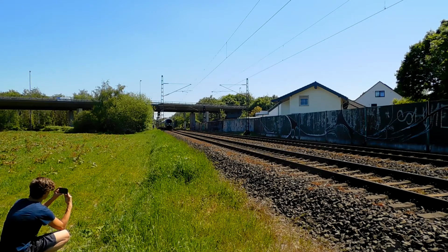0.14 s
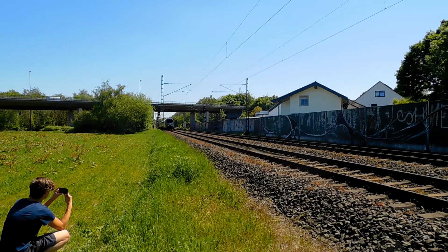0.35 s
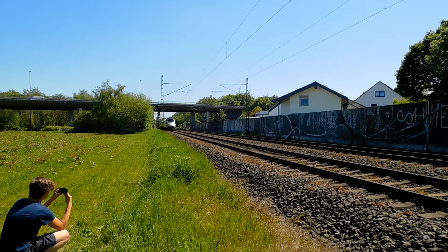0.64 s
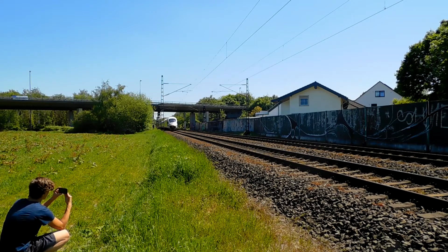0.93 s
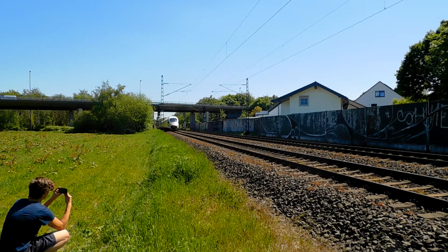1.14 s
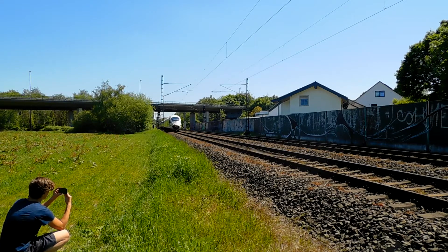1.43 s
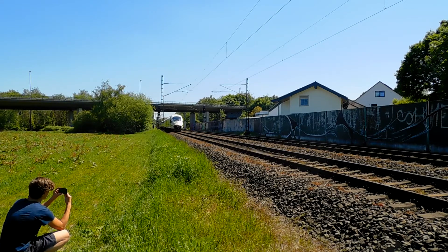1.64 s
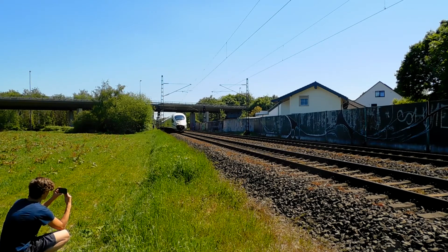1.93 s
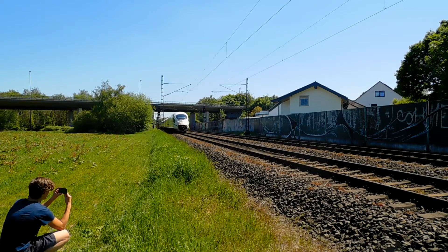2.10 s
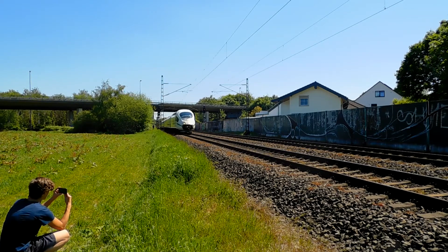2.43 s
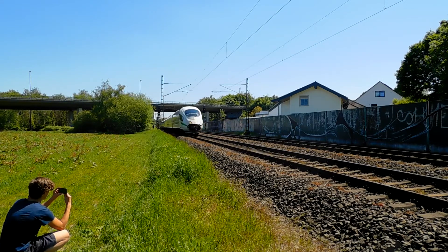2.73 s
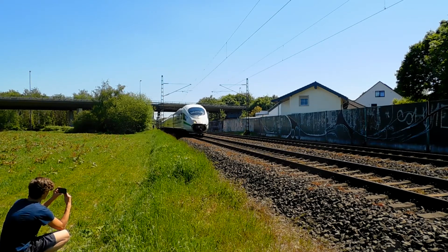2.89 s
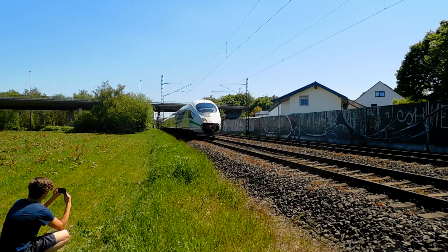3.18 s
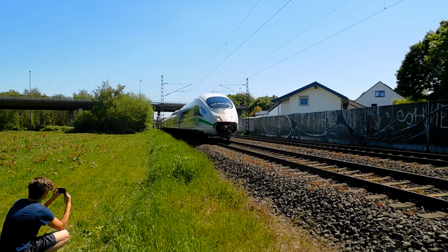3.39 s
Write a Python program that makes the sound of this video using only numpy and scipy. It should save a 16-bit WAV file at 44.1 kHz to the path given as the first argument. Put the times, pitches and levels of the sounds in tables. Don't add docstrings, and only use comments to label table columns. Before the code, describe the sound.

An electric passenger train approaches as rails sing, knock and hiss, its roar building outdoors.

```python
import sys
import numpy as np
from scipy import signal
from scipy.fft import rfft, irfft
from scipy.io import wavfile

SR = 44100
rng = np.random.default_rng(int(sys.argv[2]) if len(sys.argv) > 2 else 0)


def transcribe(u):
    v = np.clip(np.atleast_2d(u).T, -1, 1)
    q = np.round(v * 32767).astype(np.int16)
    wavfile.write(sys.argv[1], SR, q)


def linear_from_db(decibels):
    return 10 ** (np.asarray(decibels, float) / 20)


N = 156555
TIME_S = np.arange(N) / SR
HOP = 128
HZ = np.maximum(np.fft.rfftfreq(N, 1 / SR), 1)

# frequency in Hz, likeness 0 to 1.
LIKENESS = [(60, .92), (450, .98), (620, .62), (950, .7), (1400, .92), (1750, .4), (2050, .7), (2400, .5)]
# frequency in Hz, lead of left in radians.
LEAD_RAD = [(200, 0), (860, -.4), (1500, -2.1), (2000, -.2), (2300, -2.1), (2800, 0.05), (5500, .9),
            (15500, -9.2)]
# frequency in Hz, left over right in dB.
TILT_DB = [(500, 0.1), (1900, 0.1), (2350, -5), (3200, 0), (4500, -1), (5800, -3), (10000, -5), (14000, -2)]
# frequency in Hz, density in dB per Hz.
SELF_NOISE = [(8000, -19), (11500, -14), (13000, 0), (15600, 6)]
SELF_NOISE_DB = -64

# frequency in Hz, density in dB per Hz.
TRAFFIC = [(65, -56), (110, -22), (297, -19), (389, -11), (755, -4.5), (1290, -6), (1440, 0.5), (3800, -27),
           (15500, -80)]
TRAFFIC_DB = -41

# frequency in Hz, density in dB per Hz.
WIND = [(20, 0), (45, -1), (100, -5), (220, -11), (450, -32)]
WIND_DB, GUST_DB = -73, 2.5
# time in seconds, lift in dB.
PUFFS = [
    (.2, 12),
    (1.22, 14),
    (1.45, 9),
    (1.75, 6.9),
    (2.14, 14),
    (2.44, 6.8),
]
PUFF_S = 0.09

# time in seconds, level in dB.
RUMBLE = [(0.0, -62.5), (0.51, -67.5), (3.55, -55)]
# frequency in Hz, density in dB per Hz.
RUMBLE_COLOUR = [(42, -2), (62, -1.5), (95, -5), (130, -17.5)]

# time in seconds, singing in dB, hiss in dB, whine in dB.
RAILS = [(0, -42, -69.5, -68), (.5, -43.5, -69.5, -68), (1.1, -38, -65, -78), (1.46, -38.5, -64.5, -52),
         (1.53, -37.5, -59, -42.5), (1.75, -32, -58.5, -50), (2.3, -32, -54.5, -41), (2.6, -32, -54.5, -49),
         (3.04, -30.5, -53, -47), (3.09, -32.5, -52.5, -33), (3.25, -35, -51, -39.5),
         (3.32, -34, -50.5, -41), (3.55, -27.5, -50.5, -37.5)]
# frequency in Hz, density in dB per Hz.
RAIL_BODY = [(300, -27.5), (600, -21.5), (850, -8.5), (1200, -4), (1650, -11), (1850, -28), (2700, -25),
             (4300, -40)]
# frequency in Hz, width in Hz, lift in dB.
RAIL_MODES = [(466, 30, 13.5), (672, 52, 8.5), (740, 39, 3), (923, 130, 1), (1040, 175, 5.5),
              (1237, 83, -5.5), (1316, 216, 10.5), (1559, 35, 7), (1800, 20, 4), (2322, 360, 12.5)]
# frequency in Hz, density in dB per Hz.
HISS = [(3500, -33), (5400, 0.5), (6900, -26), (8300, 5.5), (10200, -6), (12500, -1), (14300, -0.5),
        (15700, 0)]
# frequency in Hz, width in Hz, lift in dB.
HISS_MODES = [(5290, 150, 7), (6900, 500, -6), (7660, 420, 10), (9040, 180, 3.5), (9570, 140, 10.5),
              (10240, 300, -3), (10830, 340, 10), (11500, 300, -8), (12300, 240, 8), (12900, 120, 11),
              (14200, 330, 4)]
# time in seconds, pitch in Hz, level in dB.
RIDGE = [(0, 1130, -81), (1.0, 1126, -51), (1.5, 1089, -40.5), (2.0, 1089, -40), (2.5, 1070, -39),
         (2.85, 1066, -36), (3.0, 1056, -30), (3.12, 1031, -29.5), (3.17, 1032, -37), (3.3, 1019, -38),
         (3.55, 996, -31)]
RIDGE_WIDTH_HZ = 28
# time in seconds, level in dB.
UPPER = [(0, -66), (1.45, -62), (1.72, -52), (1.9, -56), (2.35, -50), (2.5, -54), (2.69, -51), (3.0, -53),
         (3.55, -52)]
UPPER_HZ, UPPER_WIDTH_HZ = 2420, 230
# time in seconds, level in dB.
HUM = [(0, -68), (1.4, -60.5), (2.5, -54.5), (2.8, -52), (2.95, -44.5), (3.15, -48), (3.4, -41),
       (3.55, -49)]
HUM_HZ, HUM_WIDTH_HZ = 470.6, 23.6
WHINE_HZ, WHINE_WIDTH_HZ = 1462, 18
SQUEAL_HZ, SQUEAL_WIDTH_HZ, SQUEAL_DB = 5775, 42, -6
TONE_STEADINESS = .35
TURN_S, TURN_AT_S = .0964, 2.116
THROB_DB, THROB_SHARPNESS = 3, 1.4

# time in seconds, peak in dB, leading pitch in Hz, length in seconds.
KNOCKS = [(0.009, -32, 742, 0.022), (0.159, -30, 1117, 0.011), (0.351, -26.5, 1133, 0.017),
          (0.615, -29, 1385, 0.015), (0.63, -29.5, 1598, 0.03), (0.664, -27.5, 1137, 0.027),
          (0.711, -23, 1314, 0.023), (0.848, -29, 1125, 0.012), (0.944, -25.5, 1348, 0.018),
          (1.03, -22, 1109, 0.017), (1.118, -27.5, 1344, 0.013), (1.144, -37, 1284, 0.022),
          (1.198, -34, 1080, 0.012), (1.258, -29, 1243, 0.022), (1.327, -27, 1108, 0.018),
          (1.364, -28.5, 1050, 0.015), (1.413, -27, 1120, 0.027), (1.493, -29, 1060, 0.0098),
          (1.53, -16.5, 1345, 0.0092), (1.626, -20, 1090, 0.011), (1.6817, -13, 1283, 0.021),
          (1.7065, -13.5, 1113, 0.018), (1.701, -20, 1640, 0.014), (1.812, -23, 1340, 0.011),
          (2.014, -16, 1132, 0.011), (2.108, -13.5, 1153, 0.013), (2.133, -23, 1086, 0.012),
          (2.2055, -11.5, 1335, 0.0114), (2.308, -20.5, 1132, 0.014), (2.398, -20, 1497, 0.02),
          (2.49, -17, 1121, 0.027), (2.541, -27, 1100, 0.0091), (2.588, -17.5, 1060, 0.016),
          (2.695, -23, 1160, 0.014), (2.728, -22, 1060, 0.01), (2.777, -16.5, 1103, 0.033),
          (2.877, -16, 1320, 0.023), (2.972, -26, 1085, 0.014), (3.077, -16, 1350, 0.0063),
          (3.108, -19.5, 1040, 0.019), (3.174, -15.5, 1710, 0.0058), (3.282, -20, 1420, 0.008),
          (3.33, -16, 1320, 0.014), (3.377, -24, 1020, 0.0069), (3.393, -24, 1035, 0.0152),
          (3.451, -20, 990, 0.0099), (3.484, -16.5, 990, 0.0091), (3.527, -16, 1316, 0.008)]
# time in seconds, peak in dB, pitch in Hz, length in seconds.
BLOW = (3.368, -17, 810, .028)
# frequency in Hz, level in dB.
KNOCK_PAIR = [(1095, -10), (1325, -9.5)]
# frequency in Hz, lift in dB.
KNOCK_TILT = [(600, -11), (1000, -0.5), (1750, 11.0), (2400, -5.5), (3000, -4)]
KNOCK_LEAD_S, KNOCK_WIDTH_HZ = .003, 45
KNOCK_PITCH_DB, KNOCK_BODY_DB = -4, -10
KNOCK_RISE, KNOCK_ROUNDNESS = .55, 2.6

# time in seconds, roar in dB.
ROAR = [(0, -62.5), (1.3, -59.5), (2.2, -54.5), (2.95, -51.5), (3.2, -47), (3.55, -44)]
# frequency in Hz, density in dB per Hz.
ROAR_COLOUR = [(110, -26.5), (300, -18.5), (640, -3.5), (1000, 0), (1500, -7.5), (2300, -15), (7000, -32),
               (15500, -43)]
ROAR_DB, ROAR_DB_PER_DB = 17, 1.335
# frequency in Hz, width in Hz, lift in dB.
WHEEL_MODES = [(450, 25, -0.5), (785, 38, -5)]

# time in seconds, peak in dB.
SPARK = [
    (3.1645, -45),
    (3.1728, -40),
]
SPARK_FALL_S = .0016
# frequency in Hz, lift in dB.
SPARK_COLOUR = [(4500, -25), (7500, 20), (10000, 11), (12500, 9), (15500, -8)]


def rms_one(x):
    return x / np.sqrt(np.mean(x ** 2) + 1e-20)


def in_time(rows):
    s, *columns = np.transpose(rows)
    return [np.interp(TIME_S, s, column) for column in columns]


def at_hz(points):
    hz, value = np.transpose(points)
    return np.interp(np.log(HZ), np.log(hz), value)


def colour(points, modes=()):
    low_end = (5, points[0][1] - 30)
    high_end = (SR / 2, points[-1][1] - 30)
    db = at_hz([low_end] + list(points) + [high_end])
    for hz, width_hz, lift_db in modes:
        db = db + lift_db / (1 + (2 * (HZ - hz) / width_hz) ** 2)
    return linear_from_db(db)


def drift(rate_hz, size):
    r = np.exp(-2 * np.pi * rate_hz * HOP / SR)
    settle = 500
    draws = rng.standard_normal((size, N // HOP + 3 + settle))
    slow = signal.lfilter([1], [1, -2 * r, r * r], draws)[:, settle:]
    return slow / slow.std()


def patchy(x, shared_db, own_db, rate_hz):
    hz, _, z = signal.stft(x, SR, nperseg=512, noverlap=512 - HOP)
    rows = drift(rate_hz, size=41)[:, :z.shape[-1]]
    band = np.clip(4 * np.log2(np.maximum(hz, 30) / 30), 0, 39).astype(int)
    flicker = linear_from_db(shared_db * rows[40] + own_db * rows[band])
    return signal.istft(z * flicker, SR, nperseg=512, noverlap=512 - HOP)[1][..., :N]


def ports(three, gain):
    direct, left, right = rfft(three)
    alike = np.clip(at_hz(LIKENESS), 0, 1)
    side = np.array([[.5], [-.5]])
    lead_rad = np.interp(HZ, *np.transpose(LEAD_RAD))
    mix = np.sqrt(alike) * direct * np.exp(1j * side * lead_rad)
    mix = mix + np.sqrt(1 - alike) * np.array([left, right])
    return irfft(mix * gain * linear_from_db(side * at_hz(TILT_DB)), N)


def noise(gain):
    return rms_one(ports(rng.standard_normal((3, N)), gain))


def tone(hz, width_hz):
    b, a = signal.butter(2, width_hz / 2, fs=SR)
    wander = signal.lfilter(b, a, rng.standard_normal((2, 3, N + SR)))[..., SR:]
    wander = wander / np.hypot(*wander) ** TONE_STEADINESS
    phase = 2 * np.pi * np.cumsum(hz * np.ones(N)) / SR
    return rms_one(ports(wander[0] * np.cos(phase) + wander[1] * np.sin(phase), 1))


def traffic():
    return linear_from_db(TRAFFIC_DB) * patchy(noise(colour(TRAFFIC)), shared_db=.5, own_db=1.17, rate_hz=5.9)


def wind():
    gust = np.interp(np.arange(N) / HOP, np.arange(N // HOP + 3), drift(3.1, size=1)[0])
    puffs_db = sum(db * np.exp(-((TIME_S - s) / PUFF_S) ** 2) for s, db in PUFFS)
    air = irfft(rfft(rng.standard_normal((2, N))) * colour(WIND), N)
    return linear_from_db(WIND_DB + GUST_DB * gust + puffs_db) * rms_one(air)


def microphone_hiss():
    return linear_from_db(SELF_NOISE_DB) * noise(colour(SELF_NOISE))


def rumble():
    return linear_from_db(in_time(RUMBLE)[0] + 3.0) * noise(colour(RUMBLE_COLOUR))


def throb_db():
    turns = (TIME_S - TURN_AT_S) / TURN_S
    depth = np.interp(turns + 30, np.arange(60), rng.uniform(.5, 1.2, 60))
    load = ((1 + np.cos(2 * np.pi * turns)) / 2) ** THROB_SHARPNESS
    return THROB_DB * depth * (load - .4)


def squeal(hiss_db):
    near_db, = in_time(ROAR)
    flicker_db = 2.8 * np.repeat(drift(25, size=1)[0], HOP)[:N]
    early_db = -8 * (np.arange(N) < 1.52 * SR)
    level_db = hiss_db + 0.62 * (near_db - near_db.max()) + SQUEAL_DB + flicker_db + early_db
    return linear_from_db(level_db) * tone(SQUEAL_HZ, SQUEAL_WIDTH_HZ)


def rails():
    sing_db, hiss_db, whine_db = in_time(RAILS)
    ridge_hz, ridge_db = in_time(RIDGE)
    sing = patchy(noise(colour(RAIL_BODY, RAIL_MODES)), shared_db=1.16, own_db=1.0, rate_hz=16.4)
    hiss = patchy(noise(colour(HISS, HISS_MODES)), shared_db=.3, own_db=1.0, rate_hz=20)
    upper_band = noise(1 / (1 + (2 * (HZ - UPPER_HZ) / UPPER_WIDTH_HZ) ** 4))
    upper = linear_from_db(in_time(UPPER)[0] + 0.66 * throb_db()) * upper_band
    whine = linear_from_db(whine_db + 5.0) * tone(WHINE_HZ, WHINE_WIDTH_HZ)
    ridge = linear_from_db(ridge_db) * tone(ridge_hz, RIDGE_WIDTH_HZ)
    hum = linear_from_db(in_time(HUM)[0]) * tone(HUM_HZ, HUM_WIDTH_HZ)
    throbbing = linear_from_db(throb_db()) * (linear_from_db(sing_db + 1.0) * sing + upper + whine + ridge)
    return throbbing + squeal(hiss_db) + hum + linear_from_db(hiss_db + 1.5) * hiss


def knocks():
    t = np.arange(int(.1 * SR)) / SR
    strikes = list(KNOCKS) + [BLOW]
    draws = rng.standard_normal((len(strikes), 3, 2))
    swell, ring = np.zeros(N + len(t)), np.zeros((3, N + len(t)))
    for (s, db, hz, length_s), draw in zip(strikes, draws):
        i = int((s - KNOCK_LEAD_S - 0.1582 * length_s) * SR)
        u = t / (np.clip(length_s, .004, .04) * KNOCK_RISE)
        shape = linear_from_db(db) * (u * np.exp(1 - u)) ** KNOCK_ROUNDNESS
        swell[i:i + len(t)] += shape
        pitch_hz = hz + KNOCK_WIDTH_HZ * np.array([[0], [1], [1]]) * draw[:, :1] / 2
        tones = np.sin(2 * np.pi * pitch_hz * t + np.pi * draw[:, 1:])
        for pair_hz, pair_db in KNOCK_PAIR:
            phase = np.pi * draw[:, :1] * pair_hz / hz
            tones = tones + linear_from_db(pair_db) * np.sin(2 * np.pi * pair_hz * t + phase)
        ring[:, i:i + len(t)] += shape * tones
    body = noise(colour(RAIL_BODY, RAIL_MODES) * linear_from_db(at_hz(KNOCK_TILT)))
    return linear_from_db(KNOCK_PITCH_DB) * ports(ring[:, :N], 0.82) + linear_from_db(KNOCK_BODY_DB) * swell[:N] * body


def roar():
    near_db, = in_time(ROAR)
    level_db = near_db.max() + ROAR_DB + ROAR_DB_PER_DB * (near_db - near_db.max())
    rush = patchy(noise(colour(ROAR_COLOUR, WHEEL_MODES)), shared_db=0.13, own_db=0.35, rate_hz=3.4)
    return linear_from_db(level_db) * rush


def spark():
    shape = np.zeros(N)
    for s, db in SPARK:
        shape += linear_from_db(db - 8) * np.exp(-((TIME_S - s - SPARK_FALL_S / 2) / SPARK_FALL_S) ** 2)
    return ports(shape * rng.standard_normal((3, N)), linear_from_db(at_hz(SPARK_COLOUR)))


def scene():
    background = traffic() + wind() + microphone_hiss()
    train = rumble() + rails() + knocks() + roar() + spark()
    return background + train


def low_pass(x):
    return signal.sosfilt(signal.butter(12, 15690, fs=SR, output="sos"), x)


def record(dry):
    mix = irfft(rfft(dry) * (HZ < 15690), N)
    return low_pass(mix)


dry = scene()
out = record(dry)
transcribe(out)
```